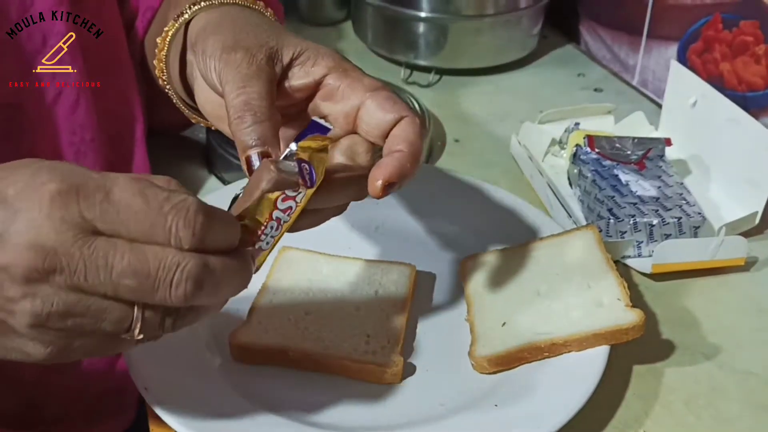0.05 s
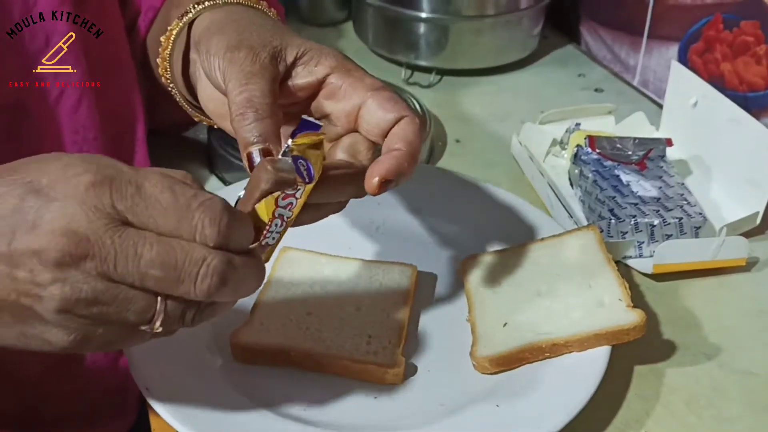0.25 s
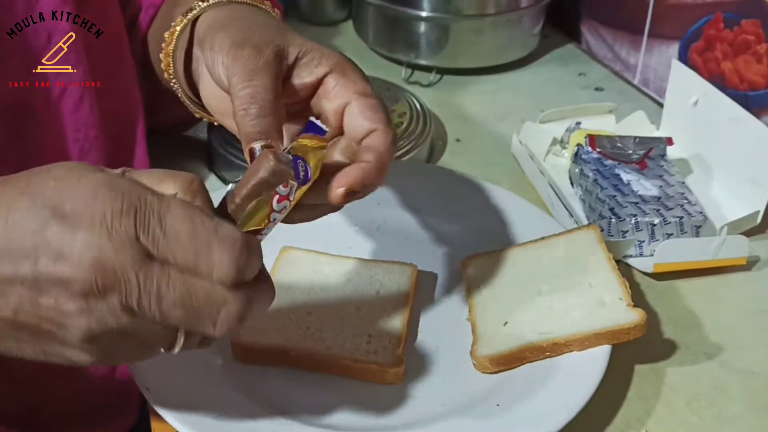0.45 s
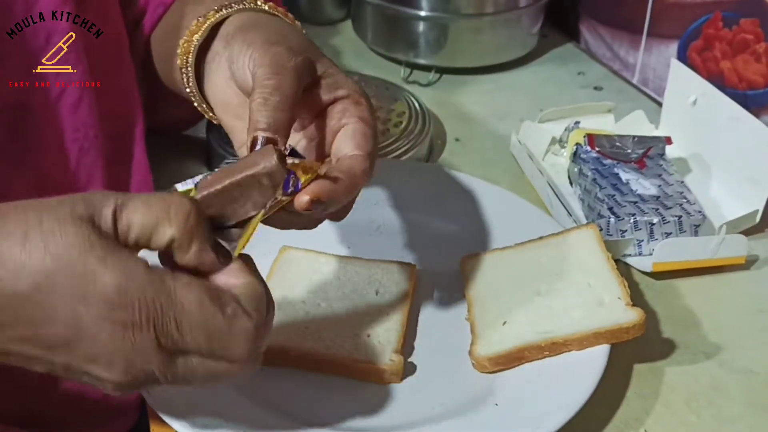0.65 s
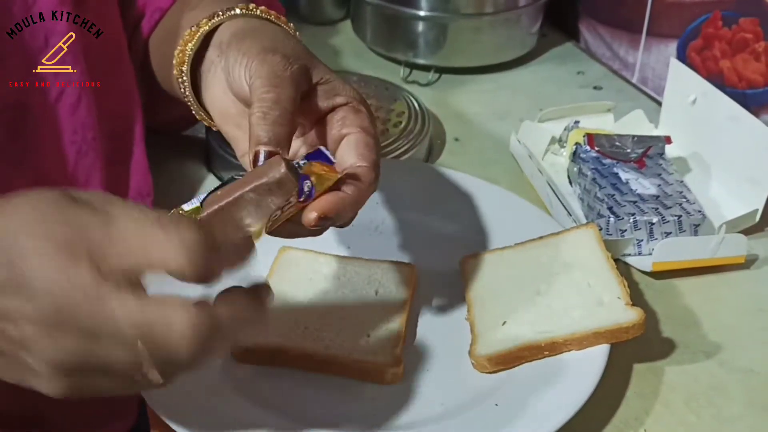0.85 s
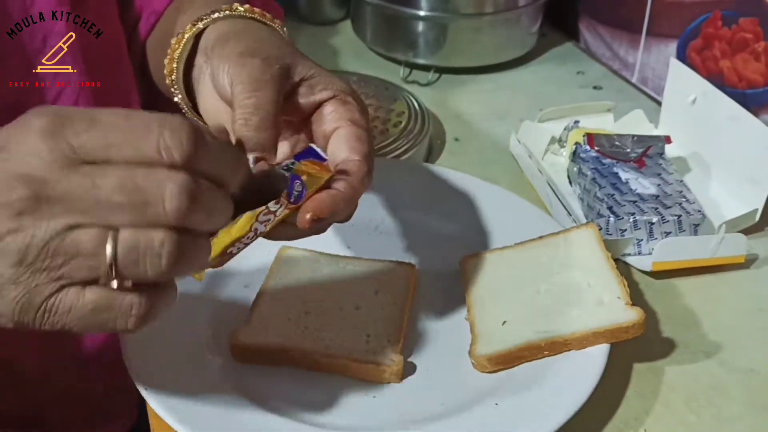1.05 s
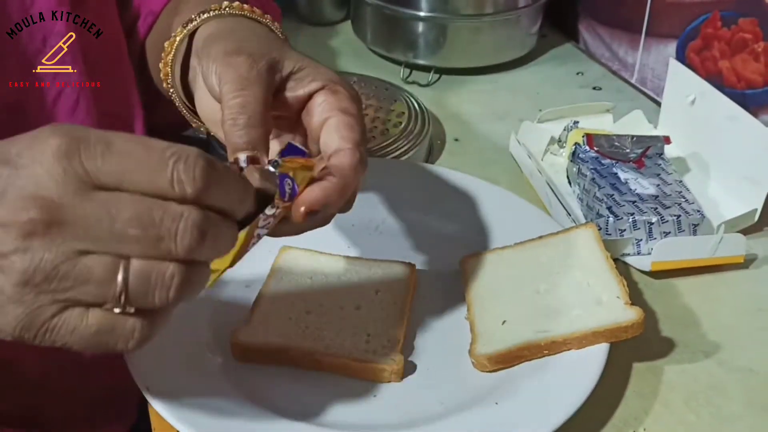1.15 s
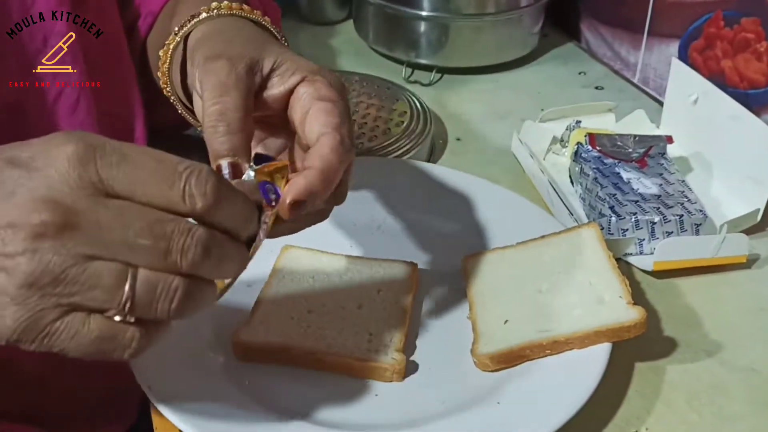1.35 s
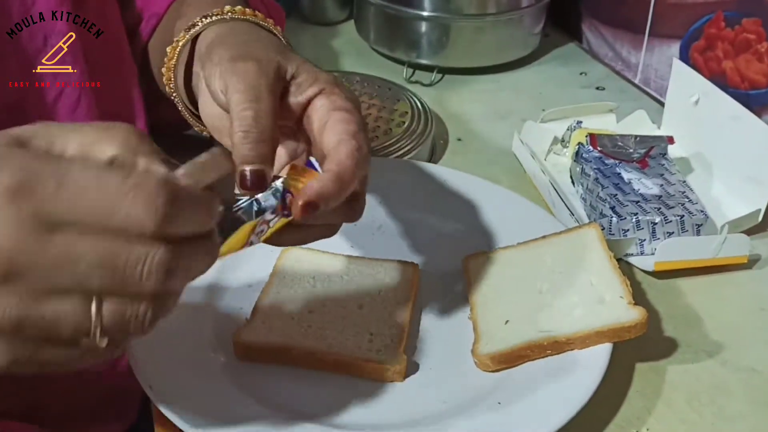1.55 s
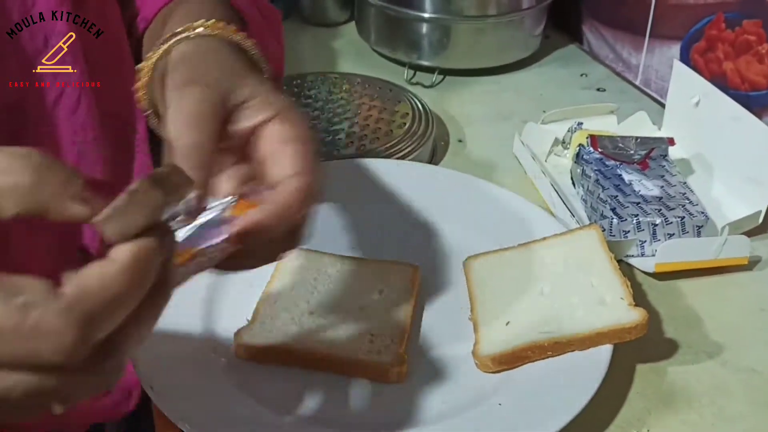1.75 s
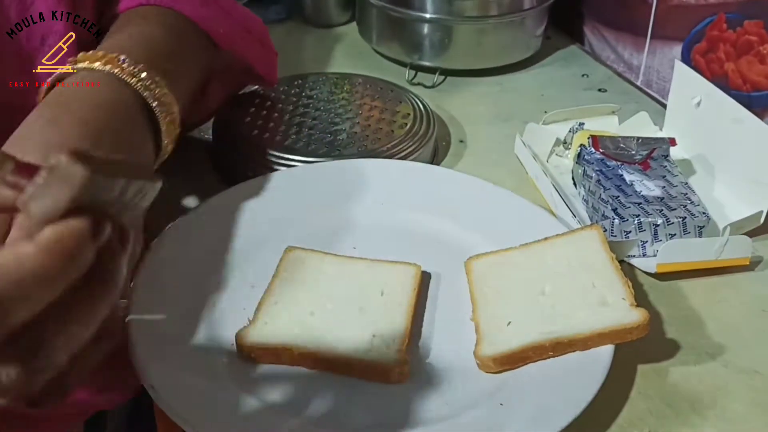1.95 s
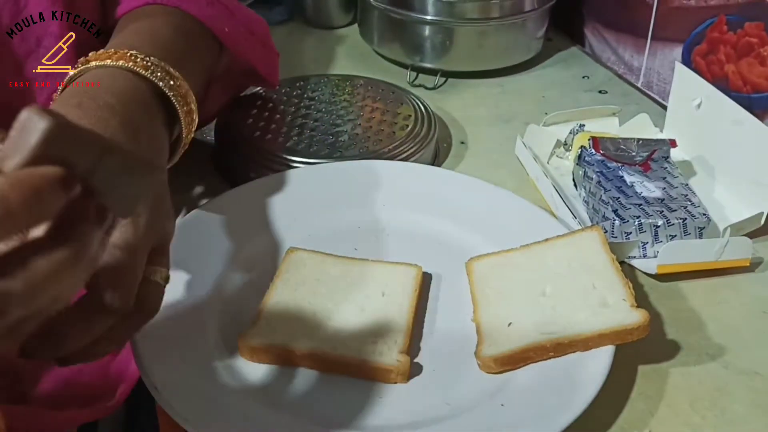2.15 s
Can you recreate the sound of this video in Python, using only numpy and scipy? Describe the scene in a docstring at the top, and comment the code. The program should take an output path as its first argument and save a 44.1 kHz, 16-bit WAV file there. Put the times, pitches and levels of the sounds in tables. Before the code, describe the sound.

A foil-plastic wrapper crinkles close to the microphone as hands peel it off a chocolate bar. Sharp snaps and fine crackle come in uneven bursts, ease briefly midway, then swell again, with a slight small-kitchen echo.

```python
"""Unwrapping a chocolate bar

Hands peel a foil-plastic wrapper above a plate in a small kitchen. Creases buckle in sharp snaps,
soft folds crumple, fine crackle runs between them, and the fingers bump the bar now and then.
The sound bounces off plate and worktop, and the room rings briefly over a low rumble.
A noise suppressor turns the pauses down."""
import sys
import numpy as np
from scipy import signal
from scipy.fft import rfft, irfft
from scipy.io import wavfile
from scipy.ndimage import uniform_filter1d

SR = 44100
rng = np.random.default_rng(int(sys.argv[2]) if len(sys.argv) > 2 else 0)


def log_audio(samples):
    """Write samples as a 16-bit WAV file to the path given in sys.argv[1]."""
    # one column per channel
    frames = np.atleast_2d(samples).T
    # limit to full scale, then quantise
    limited = np.clip(frames, -1, 1)
    pcm = np.round(limited * 32767).astype(np.int16)
    wavfile.write(sys.argv[1], SR, pcm)


N = 97020
TIME = np.arange(N) / SR
BAND_EDGES_HZ = np.r_[np.geomspace(180, 4000, 13)[:-1], np.geomspace(4000, 16500, 15)]
BAND_CENTRES_HZ = np.sqrt(BAND_EDGES_HZ[:-1] * BAND_EDGES_HZ[1:])


def from_db(db):
    """Turn decibels into a gain."""
    return 10 ** (np.asarray(db) / 20)


def unit_energy(x):
    """Scale to an energy of one."""
    return x / np.sqrt(np.sum(x ** 2) + 1e-20)


def gain_at(tone, hz):
    """Read the gain at a pitch from rows of pitch_hz, level_db."""
    pitches, db = np.transpose(tone)
    return from_db(np.interp(np.log(hz), np.log(pitches), db))


def band(x, low_hz, high_hz):
    """Keep the sound between two pitches."""
    return signal.sosfilt(signal.butter(2, [low_hz, high_hz], "band", fs=SR, output="sos"), x + 1e-18)


def add(out, start_s, sound):
    """Mix a sound in at its start time."""
    i = int(start_s * SR)
    out[i:i + len(sound)] += sound[:N - i]


def quickest_filter(gain):
    """The fastest filter with these gains that makes no sound ahead of its input."""
    cepstrum = irfft(np.log(gain))
    half = len(cepstrum) // 2
    cepstrum[1:half] *= 2
    cepstrum[half + 1:] = 0
    return np.exp(rfft(cepstrum))


def swell(t, rise_s):
    """Rise to one at rise_s, then die away."""
    age = np.maximum(t, 0) / rise_s
    return age * np.exp(1 - age)


# How hard the hands work the wrapper: time_s, level_db
HANDLING = [(0, -11.5), (.06, -10.5), (.135, -5.5), (.22, -4), (.315, -18), (.335, -13.5), (.44, -0.5),
            (.73, -2.5), (.83, -7.5), (.9, -1.5), (.96, 1.5), (1.0, -10.5), (1.07, -9), (1.125, -29.5),
            (1.18, -17), (1.2, -7.5), (1.3, -12.5), (1.37, -9.5), (1.45, -9.5), (1.56, 4), (1.68, -3.5),
            (1.75, 10), (1.8, 0.5), (1.86, -22.5), (1.94, -25.5), (1.965, -5.5), (2.04, -1), (2.11, -14.5),
            (2.2, -12.5)]
# The tone of the crackle: pitch_hz, level_db
CRACKLE_TONE = [(300, -10), (800, -5.5), (1400, -16), (3200, -1), (5400, -1.5), (7700, 7.5), (11000, -3.5),
                (15000, 0)]

def crackle(ticks_per_s=800, level_db=-45, band_share=0.3):
    """Tiny creases tick at random, each at its own few pitches, louder as the hands work harder."""
    effort = from_db(np.interp(TIME, *np.transpose(HANDLING)))
    starts = rng.random(N) < ticks_per_s / SR
    size_db = 2.5 * np.minimum(rng.exponential(1, N), 4)
    ticks = starts * from_db(size_db) * effort
    gains = unit_energy(gain_at(CRACKLE_TONE, BAND_CENTRES_HZ) * np.sqrt(np.diff(BAND_EDGES_HZ)))
    out = np.zeros(N)
    for gain, low, high in zip(gains, BAND_EDGES_HZ, BAND_EDGES_HZ[1:]):
        rings_here = rng.random(N) < band_share
        out += gain * unit_energy(band(ticks * rings_here * rng.choice([-1, 1], N), low, high))
    return from_db(level_db) * np.sqrt(N) * out


# The tone of the background noise: pitch_hz, level_db
RUMBLE_TONE = [(25, -19.5), (60, -8), (120, 1.5), (250, -7), (450, -12.5), (780, -14), (1150, -23),
               (4000, -21), (15000, -27)]

def rumble(level_db=-53, handling_share=0.12):
    """Low rumble and faint hiss, a little stronger while the hands move."""
    hz = np.maximum(np.fft.rfftfreq(N, 1 / SR), 1)
    noise = irfft(rfft(rng.standard_normal(N)) * gain_at(RUMBLE_TONE, hz), N)
    handling_db = handling_share * np.interp(TIME, *np.transpose(HANDLING))
    return from_db(level_db + handling_db) * np.sqrt(N) * unit_energy(noise)


# The tone of the kitchen's echoes: pitch_hz, level_db
ECHO_TONE = [(900, -0.5), (3400, 5.5), (7700, -3.5), (15000, -1.5)]

def echoes(sound, fade_s, delay_s):
    """Hard surfaces send back many echoes, which start after a delay and drop 60 dB in fade_s."""
    t = TIME[:SR // 2]
    tail = rng.standard_normal(len(t)) * from_db(-60 * t / fade_s)
    response = np.zeros(len(t))
    for hz, low, high in zip(BAND_CENTRES_HZ, BAND_EDGES_HZ, BAND_EDGES_HZ[1:]):
        part = unit_energy(band(tail * rng.choice([-1, 1], len(t)), low, high))
        response += gain_at(ECHO_TONE, hz) * np.sqrt(2 * (high - low) / SR) * part
    out = np.zeros(N)
    add(out, delay_s, signal.fftconvolve(sound, response)[:N])
    return out


# The tone of the wrapper itself: pitch_hz, level_db
WRAPPER_TONE = [(800, -21.5), (1300, -21), (2200, -16.5), (3300, -15), (4500, -8), (5400, -0.5), (6400, -5),
                (7700, 5.5), (9200, -3.5), (11000, -9), (13700, -1.5), (15500, -6.5)]
# Where a crease's body, middle, main ring and top lie: pitch_hz
CREASE_PITCHES = [1400, 4400, 8000, 13000]

def creases(rows, rise_s, boost_db=3, plate_delay_s=0.0014, linger_s=0.0096):
    """Each crease gives way in a burst of tiny slips that bounces off the plate and hands."""
    out, t = np.zeros(N), TIME[:2048]
    hz = np.maximum(np.fft.rfftfreq(len(t), 1 / SR), 1)
    small_sheet = 1 / np.sqrt(1 + (835 / hz) ** 4)  # so small a sheet gives off little bass
    wrapper = unit_energy(gain_at(WRAPPER_TONE, hz) * small_sheet) * np.sqrt(len(hz) * SR / 1000)
    scatter = from_db(-11.5 - 60 * t / 0.053) * (t > 0.0005)  # close echoes off hands and plate
    low_share = np.clip(1 / (1 + (hz / 3140) ** 8), 1e-6, 1 - 1e-6)
    for start_s, level_db, body_db, middle_db, top_db in rows:
        tone_db = np.array([body_db, middle_db, 0, top_db]) + 1.14 * rng.standard_normal(4)
        curve_db = np.interp(np.log(hz), np.log(CREASE_PITCHES), tone_db)
        tone = wrapper * from_db(boost_db + level_db + curve_db)
        own_rise_s = rise_s * from_db(-2 * rng.standard_normal())
        plate_bounce = from_db(-6) * swell(t - plate_delay_s, own_rise_s)
        crack = np.sqrt(swell(t, own_rise_s) ** 2 + plate_bounce ** 2 + scatter ** 2)
        low_linger = np.exp(-t / linger_s) + crack  # the low part lingers as a diffuse echo
        for envelope, share in (crack, 1 - low_share), (low_linger, low_share):
            slips = rfft(rng.standard_normal(len(t)) * envelope)
            # Even out the noise's chance peaks and dips before giving it the crease's tone.
            even_out = np.sqrt(share / uniform_filter1d(abs(slips) ** 2, size=130))
            add(out, start_s, irfft(slips * quickest_filter(tone * even_out)))
    return out


# Creases that snap: start_s, level_db, extra_body_db, extra_middle_db, extra_top_db
CREASE_SNAPS = [(0.0737, -21, -9, -12, -2), (0.1011, -27, 4, 7, 8), (0.2003, -18, 5.5, 0, -2),
                (0.2417, -39, 7, -11, 2.5), (0.2585, -16.5, -8, -5, -1), (0.3341, -29.5, 7.5, -2, 7.5),
                (0.3827, -10, -10, -15.5, 0), (0.428, -7, -14, -11, -8), (0.445, -21.5, -8, 0, 10.5),
                (0.4466, -9, -16, -19, -13), (0.4488, -18, 4.5, -4, -10), (0.4889, -26.5, -5, -5.5, 8),
                (0.4949, -22, 2, -1, 7), (0.5245, -23.5, -9, -8, -1.5), (0.5385, -18.5, 4.5, 4.5, 2.5),
                (0.5432, -13, -1, -13, 2.5), (0.5751, -26, 1, -3.5, -6.5), (0.6203, -16, -13, 9.5, 5.5),
                (0.6455, -21.5, 11.5, 8, 4.0), (0.6671, -24, -12.5, 3, -22), (0.689, -20.5, -6.5, -4, 5),
                (0.6955, -13.5, -29, 12.5, -10.5), (0.7009, -9.5, 3.5, 8.5, -1.5),
                (0.733, -19, -1, 1, -9.5), (0.7454, -10.5, -4.5, 2.5, -1), (0.7469, -13, 9.5, -11.5, -8),
                (0.792, -19.5, 11, 7, 2), (0.8454, -31.5, -5, -1.5, 6), (0.858, -21.5, 0.5, 9, -5.5),
                (0.9212, -20.5, -1, 8.5, -0.5), (0.9355, -22.5, -1.5, 2.5, -3), (0.9428, -19, 2, 1.0, 0),
                (0.9525, -19.5, -12.5, -2.5, 4), (1.0026, -2, -9, -20, -12.5), (1.0687, -29, -3.0, -6, 1.5),
                (1.3222, -48, -5, -8, -4), (1.4074, -32.5, 1.5, -6, 3.5), (1.4703, -33, 13, -9, 7),
                (1.498, -20, -23, -19, -4.5), (1.5235, -11.5, 8, 3.5, -5.5), (1.652, -33.5, 19, 13.5, 13),
                (1.6621, -10.5, 3.5, -3, -6), (1.7241, -18.5, 4.5, 11.5, -4.5), (1.7292, -13, 7.5, 6.0, 4),
                (1.7615, -23, 15.5, 4, 6), (1.9595, -26.0, -1, -2, 0.5), (2.0043, -18, 7.5, -0.5, -4.5),
                (2.1418, -43.5, 11.5, 6, 2)]

def snaps():
    """Creases buckle all at once with a sharp click."""
    return creases(CREASE_SNAPS, rise_s=0.00023)


# Knocks, rubs and rings: start_s, level_db, pitch_hz, fade_s, width_ratio
BAR_BUMPS = [(.201, -33, 3650, 0.094, 1.3), (.334, -53, 620, 0.6, 1.45), (.383, -21.5, 9600, .04, 1.08),
             (.7456, -30, 873, 0.032, 1.145), (.747, -42, 826, 0.12, 1.06), (1.0015, -32, 178, 0.014, 1.8),
             (1.0027, -4.5, 7710, 0.012, 1.112), (1.056, -51, 763, 0.096, 1.05),
             (1.556, -47.5, 533, 0.3, 1.23)]

def bumps():
    """Fingers bump or rub the bar, or a fold rings: hollow when slack, shrill when tight."""
    out, t = np.zeros(N), TIME[:SR // 2]
    for start_s, level_db, pitch_hz, fade_s, width_ratio in BAR_BUMPS:
        fade = from_db(-60 * t / fade_s)
        knock = band(rng.standard_normal(len(t)) * fade, pitch_hz / width_ratio, pitch_hz * width_ratio)
        add(out, start_s, from_db(level_db) * unit_energy(knock) * np.linalg.norm(fade))
    return out


# Folds that crumple: start_s, level_db, extra_body_db, extra_middle_db, extra_top_db
SOFT_FOLDS = [(0.9595, -21, 6, 10.5, -5), (0.9685, -17.5, -2.5, -2, -5.5), (1.1966, -37, 4, -9, 0),
              (1.2245, -33.5, 16.5, -2, 1), (1.2462, -29.5, 10.5, -1, -7), (1.3615, -28, 7, -0.5, -3),
              (1.3755, -23.5, 13.5, -2.5, -2.5), (1.591, -28, 15, 1.5, -7), (1.6795, -32, 0, -6, 14),
              (1.7385, -13.5, 4.5, 8.5, 0.5)]

def crumples():
    """Soft folds give way more slowly than the snapping creases."""
    return creases(SOFT_FOLDS, rise_s=0.0025)


def scene():
    """Mix the wrapper, its echoes and the background rumble."""
    ticks = crackle()
    wrapper = ticks + snaps() + bumps() + crumples()
    wrapper += from_db(-3.5) * echoes(ticks, fade_s=0.04, delay_s=0.0005)  # off plate and worktop
    room = from_db(-13) * echoes(wrapper, fade_s=0.17, delay_s=0.011)
    return (wrapper + room + rumble())[None]


def record(dry):
    """A noise suppressor turns quiet moments down; peaks are clipped and the highest treble is cut."""
    threshold_db, slope, depth_db, window_s, cutoff_hz = -55.5, 1.29, 22.5, 0.0089, 15450
    power = uniform_filter1d(dry ** 2, int(window_s * SR))
    level_db = 10 * np.log10(np.maximum(power, 1e-12))
    gain_db = np.clip(slope * (level_db - threshold_db) - depth_db / 2, -depth_db, 0)
    clipped = np.clip(dry * from_db(gain_db), -1, 1)
    return signal.sosfilt(signal.ellip(10, .2, 80, cutoff_hz, fs=SR, output="sos"), clipped)


dry = scene()
out = record(dry)
log_audio(out)
```